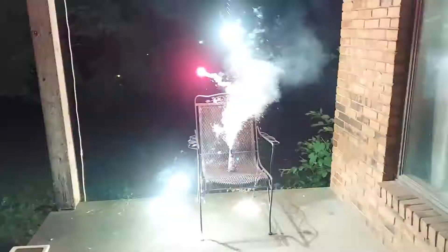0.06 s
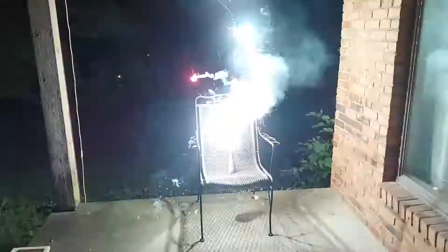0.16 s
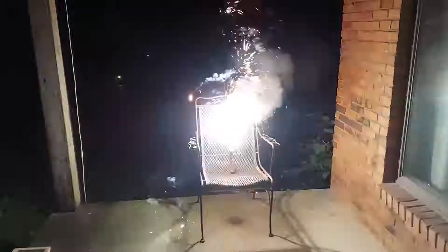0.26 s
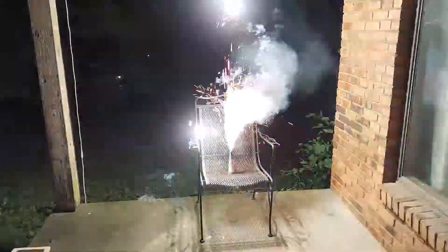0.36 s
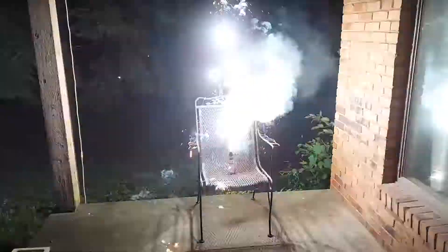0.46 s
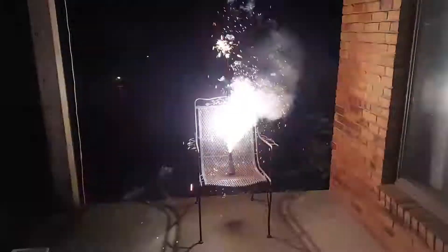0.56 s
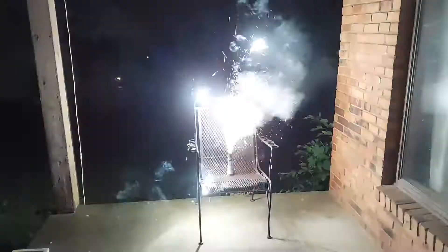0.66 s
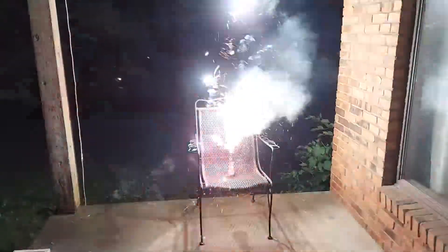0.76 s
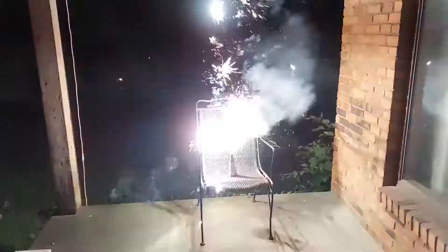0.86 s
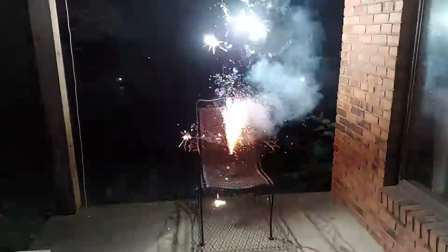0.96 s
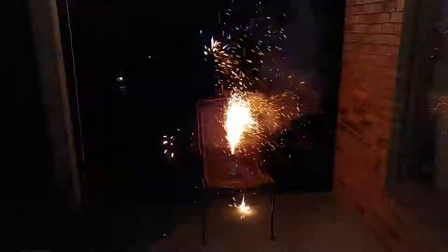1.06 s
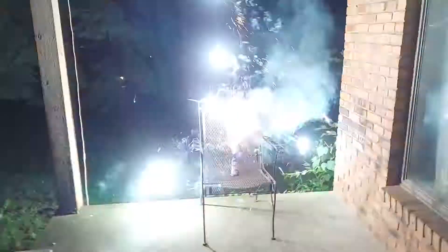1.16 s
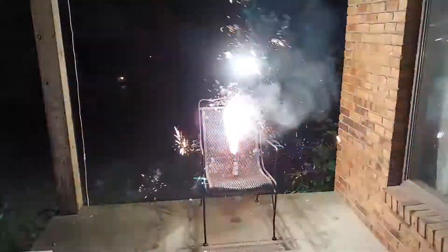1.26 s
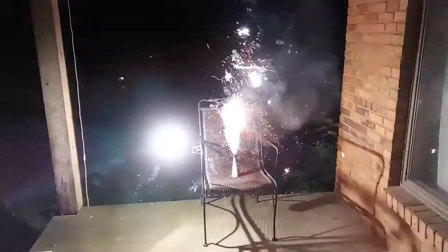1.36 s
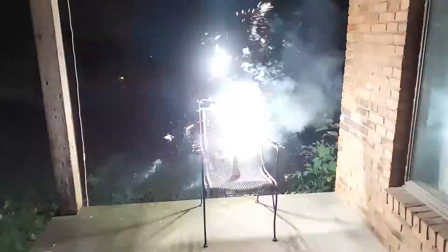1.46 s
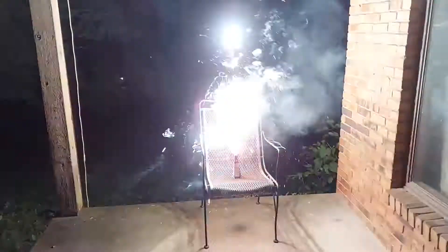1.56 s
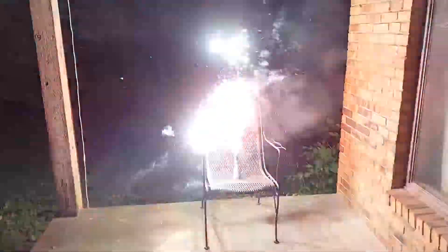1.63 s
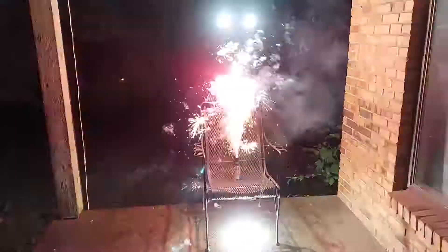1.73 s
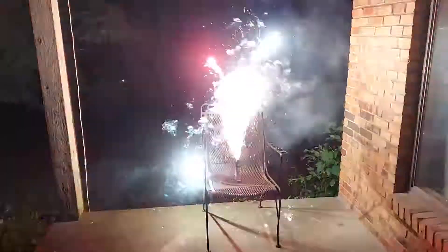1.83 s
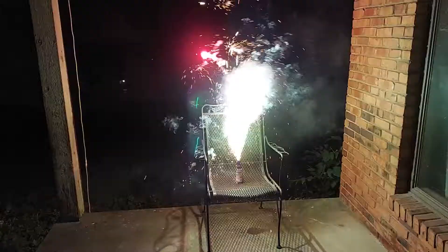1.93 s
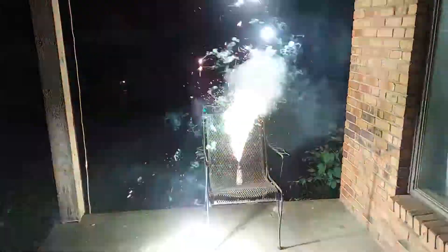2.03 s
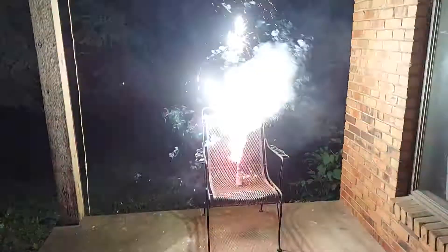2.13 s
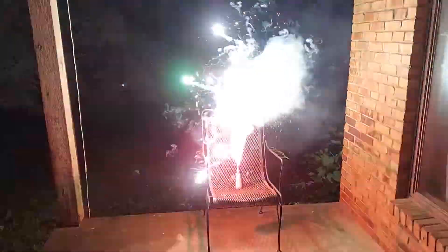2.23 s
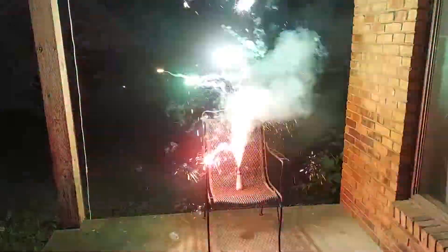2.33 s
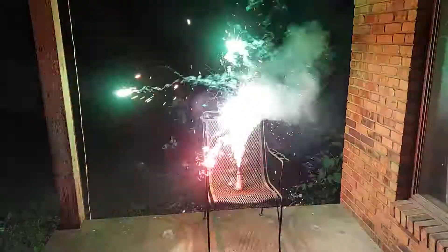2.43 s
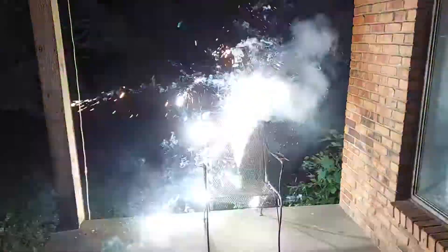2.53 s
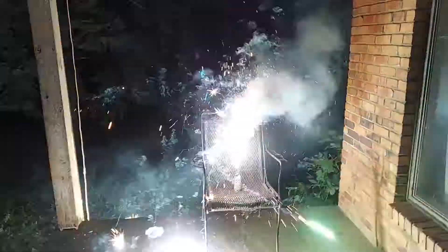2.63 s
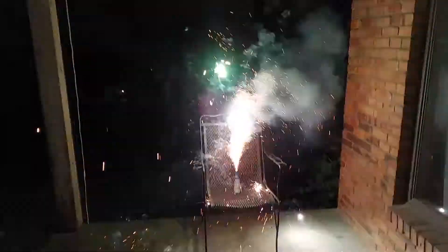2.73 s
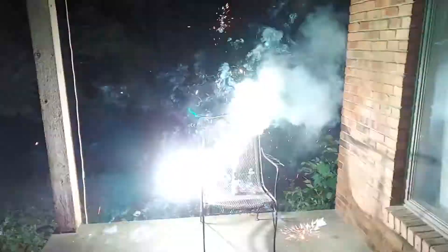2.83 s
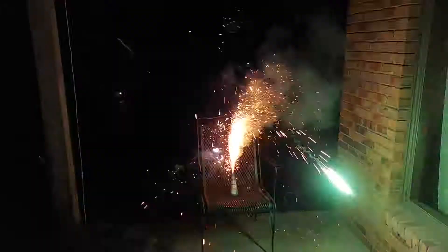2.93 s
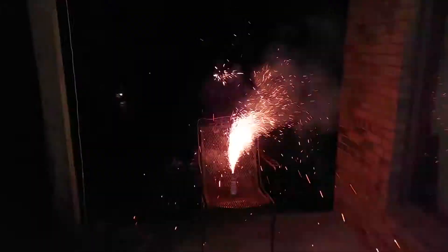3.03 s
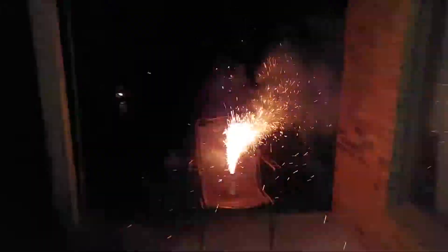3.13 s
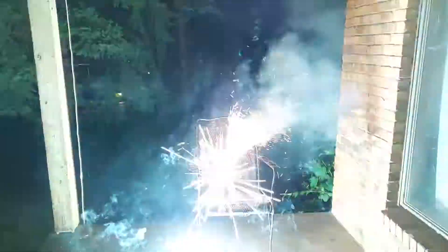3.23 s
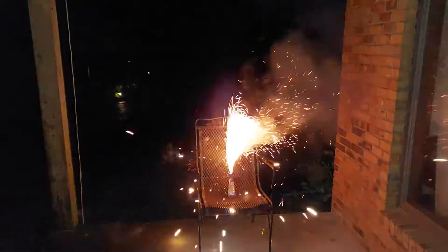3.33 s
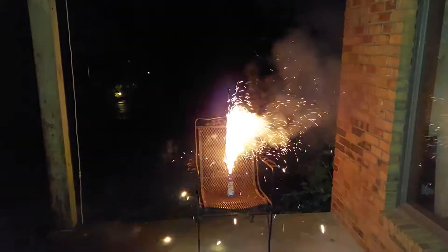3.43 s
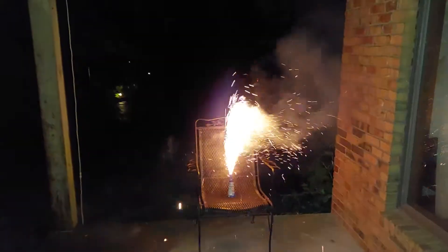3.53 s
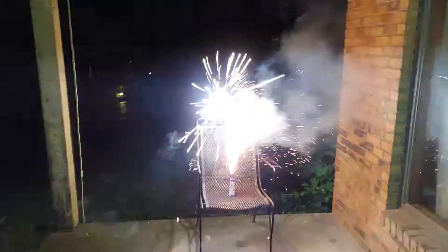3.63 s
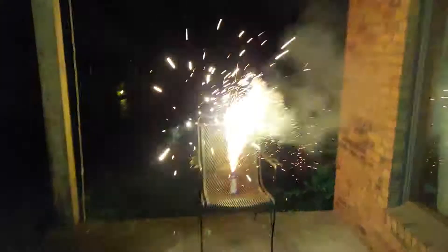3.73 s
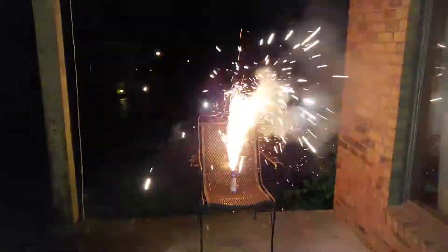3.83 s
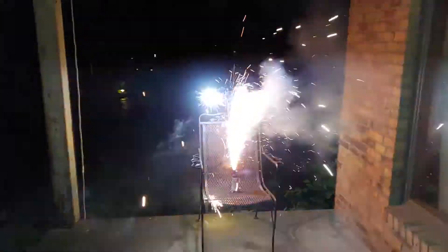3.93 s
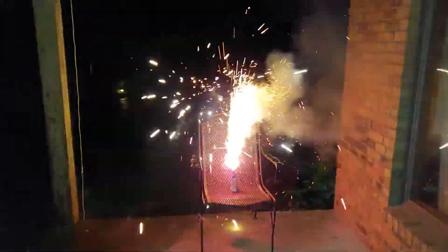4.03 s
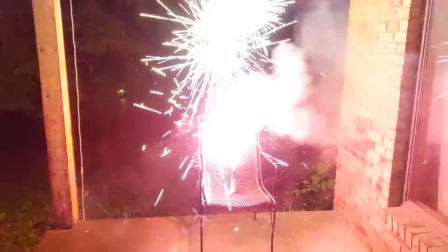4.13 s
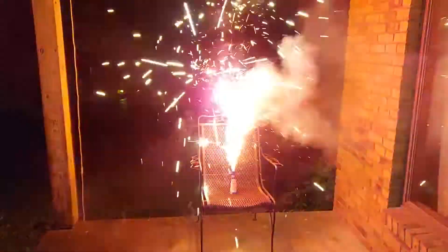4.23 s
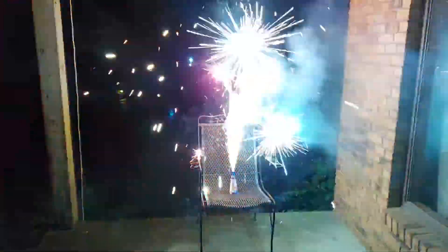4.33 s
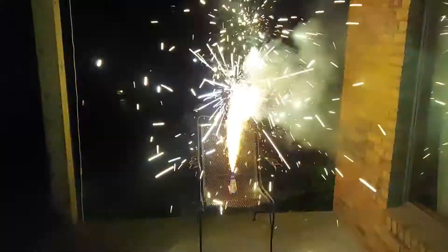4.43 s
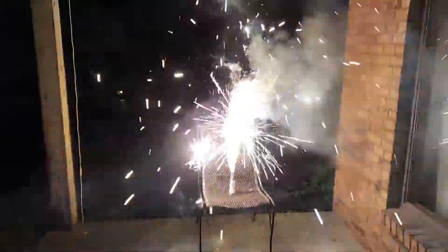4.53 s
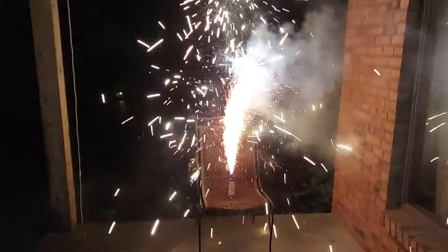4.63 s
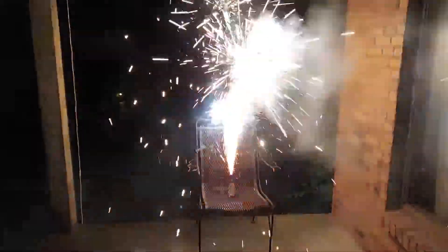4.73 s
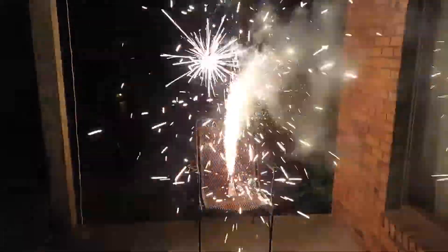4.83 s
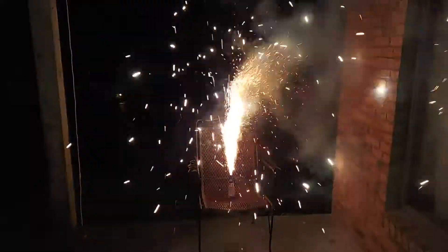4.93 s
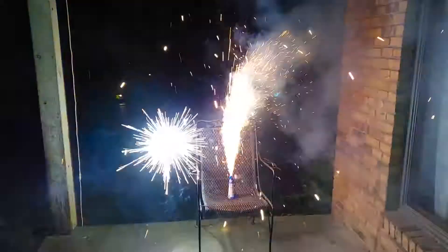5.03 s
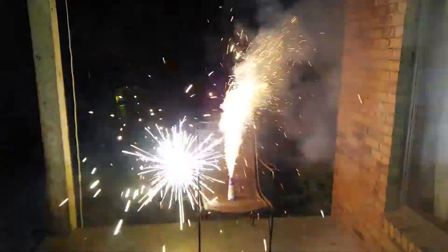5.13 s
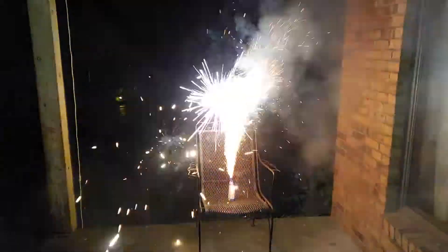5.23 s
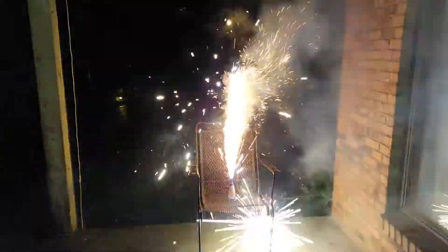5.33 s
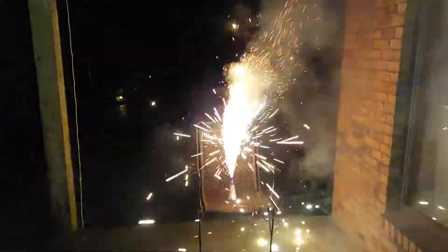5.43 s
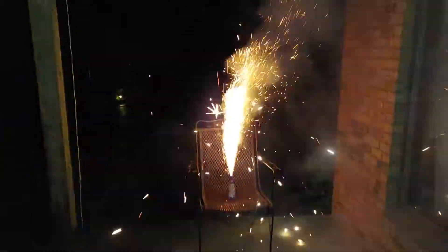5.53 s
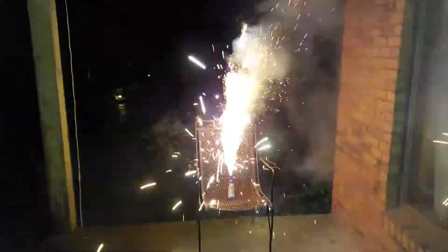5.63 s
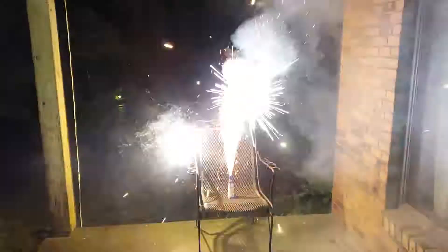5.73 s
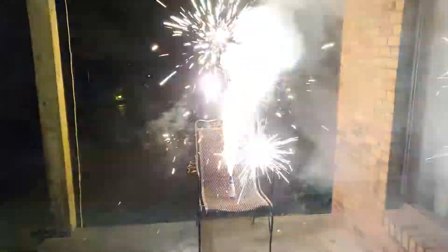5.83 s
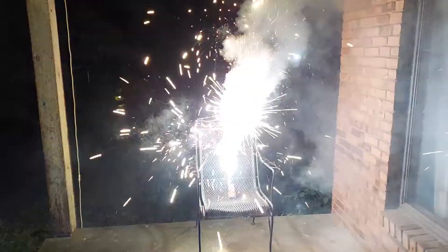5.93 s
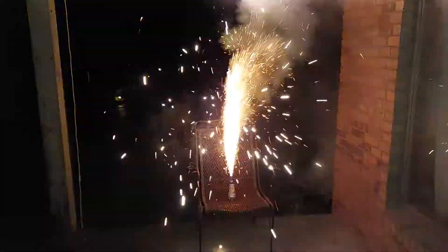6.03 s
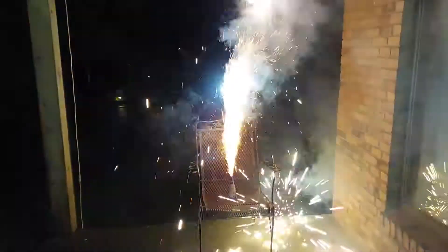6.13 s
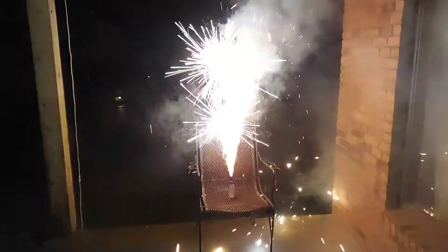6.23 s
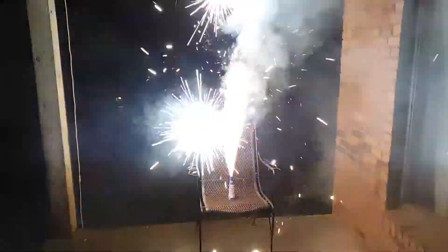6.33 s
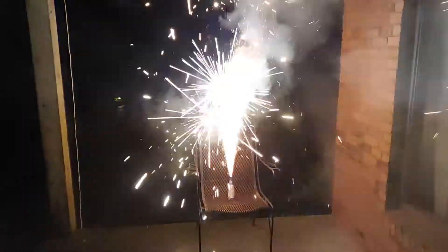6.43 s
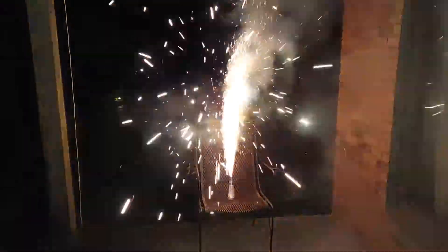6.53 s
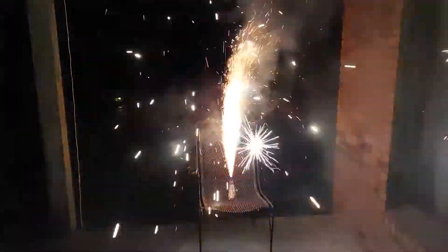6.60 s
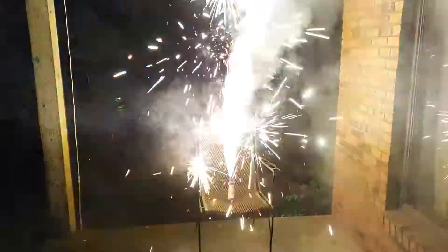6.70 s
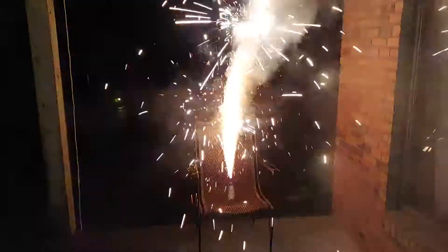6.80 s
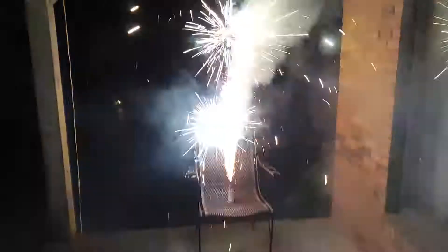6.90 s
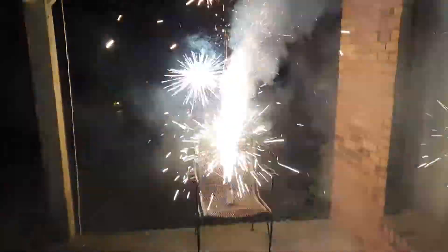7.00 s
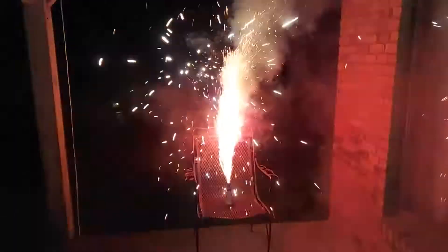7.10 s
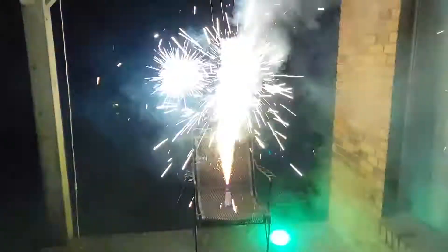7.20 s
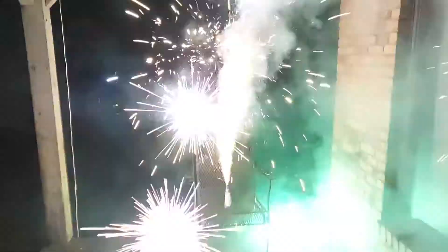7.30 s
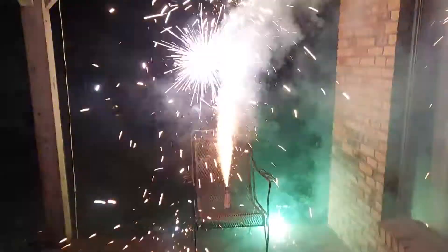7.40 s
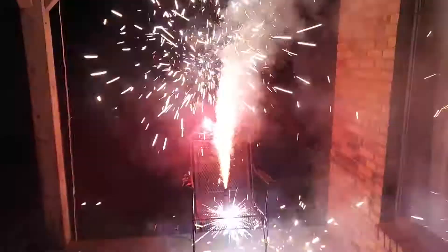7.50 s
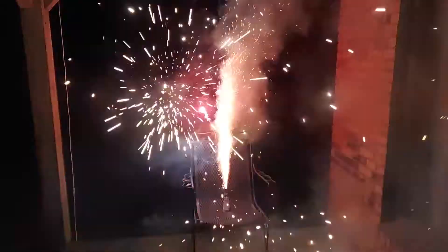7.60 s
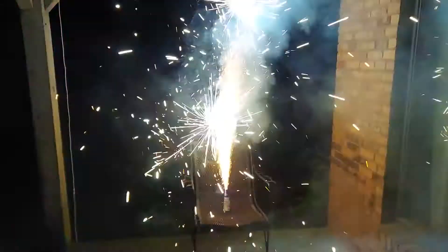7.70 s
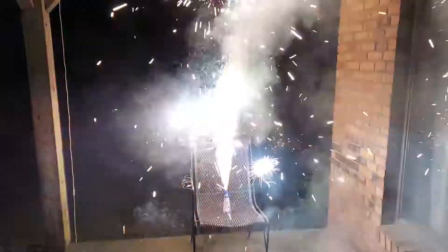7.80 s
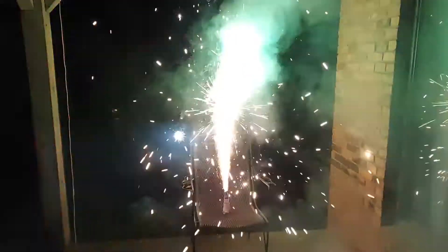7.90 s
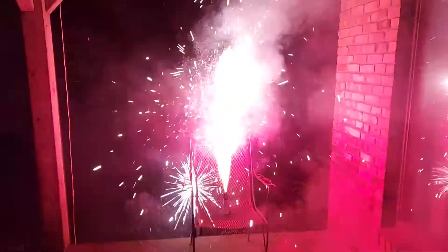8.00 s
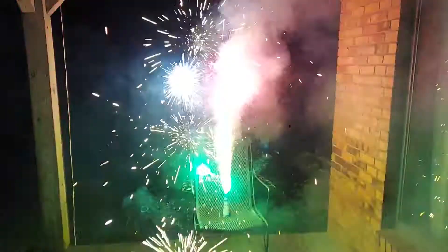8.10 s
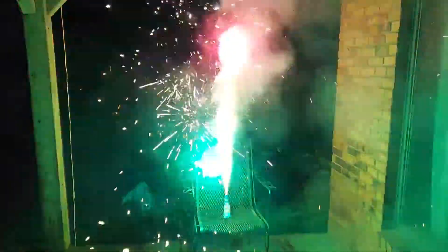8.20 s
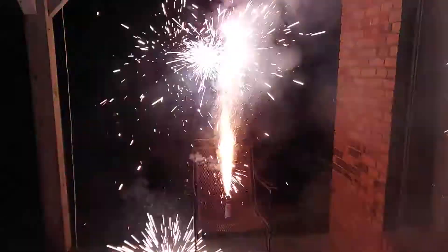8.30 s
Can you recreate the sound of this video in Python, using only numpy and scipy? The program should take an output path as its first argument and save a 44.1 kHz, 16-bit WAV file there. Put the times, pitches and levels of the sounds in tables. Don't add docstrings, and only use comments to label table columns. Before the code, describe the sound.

A fountain firework crackles close by: first a rough, fluttering roar with low thuds and frequent pops, then a brief quiet dip. Loud, dry bangs follow in irregular volleys, with clustered snaps, short hard echoes and fine fizzing embers over rushing gas. The wide stereo phone pickup in a porch is bright and slightly clipped, with wind-like slaps from the blasts. It ends still crackling.

```python
import sys
import numpy as np
from scipy import signal
from scipy.fft import rfft, irfft, next_fast_len
from scipy.io import wavfile

SR = 44100
rng = np.random.default_rng(int(sys.argv[2]) if len(sys.argv) > 2 else 0)


def pcm_store(signal):
    levels = np.round(np.clip(np.atleast_2d(signal), -1, 1) * 32767)
    wavfile.write(sys.argv[1], SR, levels.astype(np.int16).T)


def amplitude_ratio(level_db):
    exponent = np.asarray(level_db, float) / 20
    return 10 ** exponent


N = 368676
T = np.arange(N) / SR

# time_s, level_db
BURN = [
    (0, -21.5),
    (.45, -24),
    (1.05, -25.5),
    (1.6, -25),
    (2.2, -19.5),
    (2.6, -24.5),
    (2.98, -25.5),
    (3.04, -38.5),
    (3.25, -42),
]
# turning_point_s, change_db, lead_in_s
SURGES = [(0.038, -11.5, 0.046), (.09, -7, 0.021), (.22, -3.5, 0.11), (.31, 2, 0.044), (.35, -3, 0.035),
          (.44, 4, 0.087), (.52, -8, 0.034), (.71, -3.5, 0.13), (.75, 3, 0.018), (.8, -3, 0.047),
          (.91, 1, 0.033), (1.19, -9, 0.045), (1.26, 5, 0.018), (1.45, -3, 0.12), (1.51, 3.5, 0.067),
          (1.55, -2, 0.049), (1.63, 3, 0.036), (1.68, -0.5, 0.031), (1.729, 5, 0.051), (1.97, 3, 0.02),
          (2.0, -2.5, .03), (2.1, -7, 0.022), (2.21, 0, 0.033), (2.491, -6, 0.036), (2.7, -2, 0.091),
          (2.73, 2.5, 0.047), (2.81, -4.5, 0.048)]
# start_s, peak_db
TICKS = [(5.7235, -12), (5.726, -12), (5.8401, -7), (6.7057, -14), (7.3097, -13), (7.4448, -11),
         (8.0038, -10), (8.1516, -9), (8.3056, -13), (3.56, -28), (3.606, -38), (5.05, -36), (3.51, -36)]
# start_s, crack_peak_db, echo_decay_s, boom_relative_db
POPS = [(0.048, -14.5, 0.12, -1.5), (0.103, -28, 0.11, -7), (0.156, -11.5, 0.13, -9),
        (0.381, -10, 0.21, -24), (0.413, -5, 0.1, -26), (0.55, -3.5, 0.095, -14), (0.61, -21, 0.12, 2.5),
        (0.742, -19, 0.12, -4), (0.814, -17, 0.16, -5), (0.903, -9, 0.3, -3.5), (1.025, -25, 0.1, -23),
        (1.062, -9, 0.12, -10), (1.204, -12, 0.12, -7), (1.314, -3, 0.22, -12), (1.481, -15, 0.13, -2.5),
        (1.55, -9, 0.13, -8.5), (1.614, -15.5, 0.12, 0), (1.767, -14.5, 0.13, -1), (1.942, -18.5, 0.12, 3),
        (2.042, -14, 0.11, 0), (2.121, -28, 0.12, -5), (2.165, -10, 0.14, -19), (2.305, -7.5, 0.19, -8),
        (2.521, -9.5, 0.18, -12), (2.56, -8, 0.081, -14), (2.623, -16, 0.12, -0.5),
        (2.728, -18, 0.12, -3.5), (2.842, -8.5, 0.16, -28), (2.96, -8.5, 0.17, -18),
        (3.104, -16.5, 0.088, -11.5)]
# start_s, crack_peak_db, echo_decay_s, weight_db (share of body and boom), dullness_db
STARS = [(3.3286, -4, 0.33, -14.5, -1.5), (3.7195, 0.5, 0.18, -17, 2.5), (3.7638, 0, 0.25, -17.5, 1),
         (3.8838, -2, 0.3, -21.5, 2), (4.0343, -3, 0.34, -17, 1), (4.155, -3, 0.41, -17, 0.5),
         (4.41, -6, 0.56, -18, -0.5), (4.5853, -2.5, 0.27, -18.5, -1), (4.7397, -2, 0.18, -23.5, 0),
         (4.7871, -2.5, 0.27, -18.5, .3), (5.1409, -3, 0.22, -19.5, 0), (5.2273, -7, 0.31, -21, -1),
         (5.3255, -5.5, 0.21, -22, -0.5), (5.4168, -3, 0.3, -25, 1.8), (5.5043, -2.5, 0.18, -23, .3),
         (5.6903, -4, 0.19, -23, -1), (5.8356, -0.5, 0.2, -22, 1), (6.0474, -3, 0.23, -16, -0.2),
         (6.3385, -4, 0.31, -18.5, .3), (6.439, -3, 0.35, -18, 0.5), (6.5405, -5, 0.29, -16.5, 1),
         (6.7033, -4, 0.62, -20, 0), (6.9667, -6, 0.2, -21, -1.5), (7.2478, -8, 0.64, -20.5, 0.5),
         (7.4977, -2.5, 0.2, -21, 1.5), (7.6257, -4, .17, -21, 0), (7.916, -5, 0.28, -19, 1.5),
         (8.0010, -8, .25, -16, 0), (8.1175, -9.5, 0.19, -11.5, -1)]
# start_s, crack_peak_db, echo_decay_s, weight_db
FOLLOWERS = [(4.1736, -15, 0.79, -12), (4.2824, -10, 0.26, -38), (4.4348, -1.5, 0.12, -22),
             (4.5008, -6.5, 0.17, -22.5), (4.6386, -5.5, 0.36, -21.5), (4.8538, -8.5, 0.33, -28),
             (5.7232, -12.5, 0.25, -16.5), (5.8896, -4, 0.33, -18), (5.9415, -4.5, 0.077, -21.5),
             (5.973, -5.5, 0.27, -27), (5.9854, -5, 0.25, -21), (6.769, -3.5, 0.12, -16),
             (6.8337, -11.5, 0.26, -20), (6.859, -7.5, 0.28, -19.5), (6.9964, -5.5, 0.28, -22),
             (7.0652, -5.5, 0.24, -17.5), (7.1036, -4.5, 0.22, -25), (7.305, -6, 0.32, -15),
             (7.3421, -3, 0.6, -17.5), (7.5216, -4.5, 0.32, -21), (7.5411, -2, 0.22, -17),
             (7.6785, -8, 0.53, -18), (7.7322, -6.5, .28, -14), (7.8007, -6, 0.36, -19),
             (8.027, -4, 0.26, -17.5), (8.1486, -5.5, 0.12, -32), (8.223, -4.5, 0.23, -17.5),
             (8.297, -7, 0.16, -22), (8.3409, -7.5, 0.19, -18)]
# start_s, crack_peak_db
SNAPS = [(3.257, -21.5), (3.3988, -18), (4.2009, -5), (4.2205, -9.5), (4.6614, -7.5), (4.799, -9),
         (4.814, -3), (4.8704, -8.5), (4.8895, -7.5), (4.9207, -7.5), (4.945, -27), (5.0435, -37),
         (5.2558, -19), (6.562, -13), (7.03, -10.5), (7.3241, -8.5), (7.3612, -24), (7.4007, -6),
         (7.4242, -4), (7.443, -25), (7.563, -8), (7.7502, -4.5), (7.8184, -12), (7.8408, -10.5),
         (7.928, -24), (8.0492, -6), (8.179, -9), (8.201, -8), (8.239, -10)]
# start_s, crack_peak_db, echo_decay_s, boom_relative_db, body_relative_db,
# dullness_db (if any)
PUFFS = [
    (3.223, -33, 0.21, -1, 7),
    (3.2933, -22, 0.25, -4.5, -7),
    (6.207, -3, 0.2, -19.5, -15, 2.5),
    (6.217, -16, 0.13, -11.5, -13),
    (6.349, -19, 0.16, -23, -8),
]
# start_s, push_db, length_ms
AIR_PUSHES = [
    (7.1, -28, 1.7),
    (6.221, -17.5, 1.77),
    (4.04, -27, 3.1),
    (3.3, -32, 1.8),
    (3.768, -29, 1.6),
              (.05, -19.5, 1.5), (0.124, -28, 1.6), (.162, -29, 1.4), (0.245, -27, 2.1), (.305, -26, 2.8),
         (0.406, -26, 2.5), (.45, -25, 2.2), (.55, -28, 2), (.742, -28, 2), (.97, -23, 1.6),
         (1.065, -26, 1.8), (1.228, -29, 2.2), (1.328, -28, 1.1), (1.402, -26, 2.4), (1.431, -28, 2),
         (1.508, -27, 2.2), (1.615, -22, 2), (1.711, -24, 2.1), (2.082, -24, 2), (2.2, -22, 2),
         (2.2605, -23, 1.4), (2.2698, -22, 1.6), (2.3094, -19, 1.6), (2.347, -30, 2), (2.566, -24, 2),
         (2.628, -24, 2), (2.907, -22, 2), (2.965, -30, 2), (3.381, -36, 2.2), (4.067, -30, 1.9),
         (4.1, -34, 1.8), (4.593, -28, 2), (5.952, -35, 2), (5.978, -37, 1.8), (6.2105, -21, 1.4),
         (6.364, -32, 2), (6.493, -39, 2), (6.857, -32, 2), (7, -35, 1.8), (7.275, -29, 2.3),
         (7.643, -31, 2), (8.048, -34, 2)]
# time_s, level_db
JET = [(2.97, -44.5), (3.64, -37.5), (3.9, -34), (4.47, -41), (4.85, -39.5), (5.15, -46), (5.33, -38),
       (5.53, -44.5), (5.79, -51), (5.92, -36), (6.2, -42.5), (6.41, -37), (7.07, -41.5), (7.3, -41.5),
       (7.43, -40), (8.04, -46), (8.18, -35), (8.36, -40.5)]
# start_s, pressure_db, length_ms, direction (push 1 or pull -1)
LEFT_GUSTS = [(4.184, -16, 3.4, 1), (4.192, -15, 2.8, 1), (4.2038, -6, 1.06, -1), (4.2056, -6, 1.2, -1),
              (4.4572, -7, 3.9, 1), (4.607, -11.5, 2.7, -1), (4.8537, -13, 3.4, -1), (5.2278, -28, 3.3, 1),
              (6.7239, -12, 2.4, -1), (6.7259, -5.5, 2.3, 1), (7.3429, -8.5, 0.81, -1),
              (7.3449, -5.5, 1.4, -1), (7.3517, -21, 3, -1), (7.395, -6.5, 2.4, 1),
              (7.4236, -11.5, 3.8, -1), (7.541, -11.5, 1.7, -1), (7.5447, -12, 2.5, 1),
              (7.5523, -9, 3.1, 1), (7.6815, -8.5, 1, 1), (7.748, -4, 1.2, -1), (7.7512, -12, 1.6, -1),
              (7.846, -10.5, 3.7, 1), (7.9298, -11, 2.2, -1), (7.934, -7.5, 3.6, 1), (8.2365, -6, 2.6, -1)]
# start_s, pressure_db, length_ms, direction (push 1 or pull -1)
RIGHT_GUSTS = [(4.1943, -13, 3.5, 1), (4.2036, -14, 1.1, -1), (4.206, -16, 1.1, -1), (4.609, -19, 2.8, -1),
               (4.6628, -20, 4.4, 1), (4.873, -11, 4, -1), (5.231, -19, 4, 1), (6.7261, -21, 2, 1),
               (7.345, -10.5, 2, -1), (7.358, -14, 4.5, 1), (7.394, -13, 2.5, -1), (7.402, -14, 2.5, -1),
               (7.5402, -13, 1.6, 1), (7.543, -11, 3.5, -1), (7.679, -14, 1.5, 1), (7.6814, -1, 1.3, -1),
               (7.7486, -11, 1.3, -1), (7.754, -10, 4.4, 1), (7.9298, -13, 1.1, -1), (7.932, -6.5, 3.1, -1)]

# pitch_hz, level_db
ROAR = [(25, -28), (50, -26.5), (100, -5), (200, -3), (400, -2.5), (800, -7), (1200, -9), (1600, -14),
        (2200, -21), (6000, -35.5)]
# pitch_hz, level_db
SIZZLE = [(300, -0.5), (1200, -50), (2200, -5.5), (4500, -5.5), (8000, -7.5), (16000, -2)]
# pitch_hz, level_db
CRACK = [(600, -45.5), (1500, -14.5), (2200, -9.5), (4000, -7.5), (8000, -4.5), (16000, -0.5)]
# pitch_hz, level_db
BODY = [(300, -25.5), (600, -3.5), (800, -5.5), (1100, -3.5), (1450, -3), (1900, -10), (3500, -26.5)]
# pitch_hz, level_db
BOOM = [(30, -22.5), (80, -4), (150, -0.5), (300, 2), (450, -4), (750, -19), (2000, -27)]
# pitch_hz, level_db
HISS = [(25, -42), (70, -2), (150, -1), (700, -3.5), (1500, 0.5), (1800, -5), (3800, -8.5), (5400, -10),
        (6000, -18.5), (16000, -16)]
# pitch_hz, level_db, ring_time_s (to fall 60 dB)
PORCH = [(118, -30, 0.14), (160, 8, 0.11), (233.3, 3, 0.065), (276, -10, 0.15), (363.2, -1.5, 0.34),
         (480, -7, 0.029)]
# pitch_hz, level_db, ring_time_s (to fall 60 dB)
TUBE = [(345, -6, .15), (657, -10, 0.1), (1170, -9, 0.1), (1460, -5, 0.16), (1990, -17, .12),
        (3760, -10, 0.1), (4250, -18, .06), (5000, -19, .1)]
# pitch_hz, likeness (0 to 1)
ALIKE = [(60, 0.93), (250, 0.96), (700, 0.59), (1500, 0.11), (3500, 0.29), (7000, 0), (12000, 0.02)]
# pitch_hz, level_db
PHONE = [(20, -35), (45, -2), (7800, 2), (9600, -7.5), (11000, -2), (12600, 0.5), (15000, 1.5)]
# pitch_hz, left_minus_right_db
PORTS = [(60, .5), (380, .5), (700, 0), (1290, -3), (2380, .8), (4400, -.3), (8000, 1.5), (15000, 2.3)]


def along(points, hz):
    at, value = np.transpose(points)
    return np.interp(np.log(hz + 1), np.log(at), value)


def colour(x, points, size=4096, unit=True):
    gain = amplitude_ratio(along(points, np.arange(size // 2 + 1) * SR / size))
    cepstrum = irfft(np.log(gain))
    cepstrum[1:size // 2] *= 2
    cepstrum[size // 2 + 1:] = 0
    taps = irfft(np.exp(rfft(cepstrum)))
    if unit:
        taps /= np.sqrt(np.sum(taps ** 2))
    return signal.oaconvolve(np.atleast_2d(x), taps[None], axes=1)[:, :N]


def ring(x, modes, ring_db):
    notes = 0
    for hz, db, t60 in modes:
        r = np.exp(-np.log(1000) / (t60 * SR))
        turn = 2 * np.pi * hz / SR
        note = signal.lfilter([0, r * np.sin(turn)], [1, -2 * r * np.cos(turn), r * r], x)
        notes = notes + amplitude_ratio(db) * np.sqrt(1 - r) * note
    return x + amplitude_ratio(ring_db) * notes


def grains(rate, spread_db, smear_s):
    clicks = rng.random(N) < rate / SR
    size = clicks * amplitude_ratio(spread_db * np.minimum(rng.exponential(size=N), 4))
    power = signal.lfilter([1], [1, -np.exp(-1 / (smear_s * SR))], size ** 2)
    return rng.standard_normal((3, N)) * np.sqrt(power / power.mean())


def spray():
    recover_s = 0.044
    burn_db = np.interp(T, *np.transpose(BURN))
    for s, db, lead_s in SURGES:
        burn_db = burn_db + np.interp(T, [s - max(lead_s, .01), s, s + recover_s], [0, db, 0])
    sizzle_db = burn_db + np.interp(T, [2.98, 3.06], [-12, -6.5])
    burning = np.interp(T, [3.2, 3.3], [1, 0])
    pops = 0.7 * grains(200, 2.6, 0.004) + 0.8 * rng.standard_normal((3, N))
    ticks = .5 * grains(400, 4.1, 0.0027) + 0.36 * grains(60, 3, 0.0069)
    ticks = ticks + 0.58 * rng.standard_normal((3, N))
    roar = amplitude_ratio(burn_db - 3.5) * ring(colour(pops, ROAR), PORCH, -28.5)
    sizzle = amplitude_ratio(sizzle_db + 9.0) * colour(ticks, SIZZLE)
    return burning * (roar + sizzle)


def embers():
    decay_s = 0.0012
    fizz = amplitude_ratio(-55) * grains(900, 2.5, .003)
    fade = np.exp(-np.arange(400) / (decay_s * SR)) / 2
    for s, db in TICKS:
        at = int(s * SR)
        fizz[:, at:at + len(fade)] += amplitude_ratio(db) * fade * rng.standard_normal((3, len(fade)))
    return colour(fizz, CRACK)


def bursts(table, crest_db=13, boom_db=-4, body_db=-10, first_db=5, first_s=0.0028, blur_s=.03, sparse=.03,
           boom_s=0.044, shock_db=10):
    out = np.zeros((3, 3, N + SR))
    t = np.arange(int(.4 * SR)) / SR
    dense = np.clip(sparse + (t / blur_s) ** 2, 1e-3, 1)
    swell = np.exp(-t / boom_s) * (1 - 1.17 * np.exp(-t / 0.0008))
    for row in table:
        missing = [-22, 0][len(row) - 4:]
        s, db, t60, boom_rel_db, body_rel_db, dull_db = [*row, *missing]
        echoes, wash, push = rng.standard_normal((3, 3, len(t)))
        echoes *= (rng.random(echoes.shape) < dense) / np.sqrt(dense)
        clumps = rng.standard_normal(len(t) // 32 + 1).repeat(32)[:len(t)]
        echoes *= amplitude_ratio(3.5 * clumps * np.exp(-t / 0.012))
        echoes[:, 0] = amplitude_ratio(shock_db)
        bounce = .5 * (.25 + .75 * np.exp(-t / .012))
        echoes += bounce * np.roll(echoes, rng.integers(4, 40), axis=1)
        dull = np.tanh(dull_db / 8)
        echoes = (echoes + dull * np.roll(echoes, 2, axis=1)) / np.hypot(1, dull)
        push[:, :40] += 1.1
        fall = amplitude_ratio(db + first_db * np.exp(-t / first_s) - 60 * t / max(t60, .03))
        crack = amplitude_ratio(-crest_db) * fall * echoes
        body = amplitude_ratio(body_rel_db + body_db) * fall * wash
        blast = amplitude_ratio(db + boom_rel_db + boom_db) * swell * push
        at = int(s * SR)
        out[:, :, at:at + len(t)] += [crack, body, blast]
    return out[..., :N]


def crackle():
    snaps = [(s, db, 0.26, -19.5) for s, db in SNAPS]
    stars = []
    for s, db, t60, weight_db, *dull in STARS + FOLLOWERS + snaps:
        stars.append((s, db, t60, weight_db - 7, weight_db, *dull))
    large = bursts(stars + PUFFS)
    small = bursts(POPS, crest_db=20.5, boom_db=-8.5, body_db=-2.5, shock_db=-1)
    crack, body, blast = large + small
    return colour(crack, CRACK) + colour(body, BODY) + ring(colour(blast, BOOM), PORCH, -24.5)


def thuds():
    push = np.zeros((3, N))
    for s, db, ms in AIR_PUSHES:
        puff = np.hanning(int(ms * SR / 1000))
        at = int(s * SR)
        push[0, at:at + len(puff)] += amplitude_ratio(db) * puff
    return ring(push, PORCH, -10.5)


def jet():
    gas = 0.4 * rng.standard_normal((3, N)) + 0.33 * grains(180, 0.71, 0.0068)
    level_db = np.interp(T, *np.transpose(JET)) + 3
    return amplitude_ratio(level_db) * ring(colour(gas, HISS), TUBE, -8)


def gusts(low_cut_hz=40):
    rise, fall = 0.14, 0.59
    swirls = (0, 1, 1), (0.78, 2.7, -amplitude_ratio(-17))
    ports = np.zeros((2, N))
    for port, table in zip(ports, (LEFT_GUSTS, RIGHT_GUSTS)):
        for s, db, ms, push in table:
            for lag, stretch, gain in swirls:
                u = np.arange(0, 4, 1000 / (stretch * ms * SR))
                slug = 2 * (1 - np.exp(-u / rise)) * np.exp(-u / fall)
                at = int((s + lag * ms / 1000) * SR)
                port[at:at + len(slug)] += np.sign(push) * amplitude_ratio(db) * gain * slug
    return signal.sosfilt(signal.butter(4, low_cut_hz, "high", fs=SR, output="sos"), ports)


def stereo(three):
    size = next_fast_len(N)
    alike = np.clip(along(ALIKE, np.arange(size // 2 + 1) * SR / size), 0, 1)
    shared, *own = rfft(three, size)
    return irfft(np.sqrt(alike) * shared + np.sqrt(1 - alike) * np.array(own), size)[:, :N]


def scene():
    fountain = spray() + embers() + crackle() + thuds() + jet()
    return stereo(fountain) + gusts()


def band_limit(x):
    return signal.sosfilt(signal.butter(12, 16970, fs=SR, output="sos"), x)


def record(dry):
    hz = np.geomspace(20, 20000, 60)
    heard = []
    for channel, side in zip(dry, (1, -1)):
        response_db = along(PHONE, hz) + side * along(PORTS, hz) / 2
        heard.append(colour(channel, list(zip(hz, response_db)), unit=False))
    overloaded = np.tanh(np.vstack(heard) * 1.1) / 1.1
    top_cut = signal.ellip(16, .3, 60, 15720, fs=SR, output="sos")
    mix = signal.sosfilt(top_cut, overloaded)
    return band_limit(mix)


dry = scene()
out = record(dry)
pcm_store(out)
```